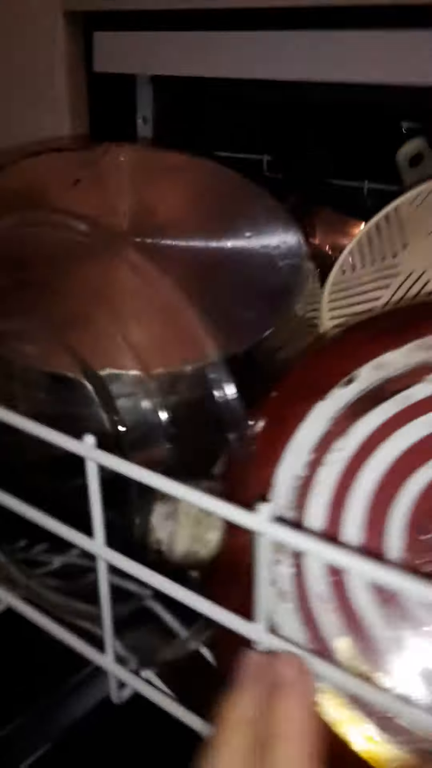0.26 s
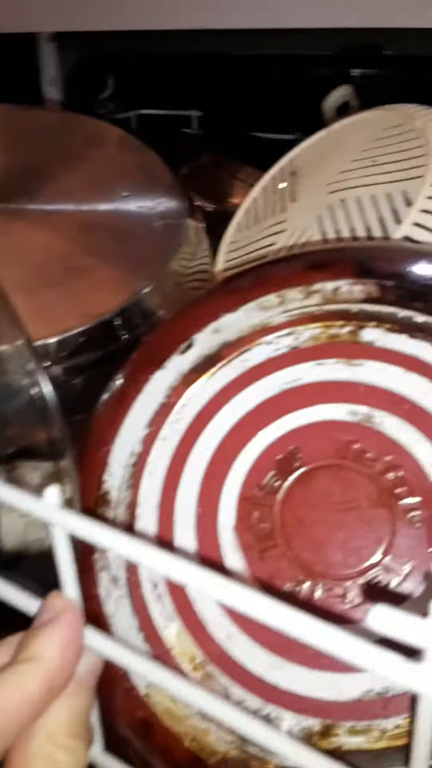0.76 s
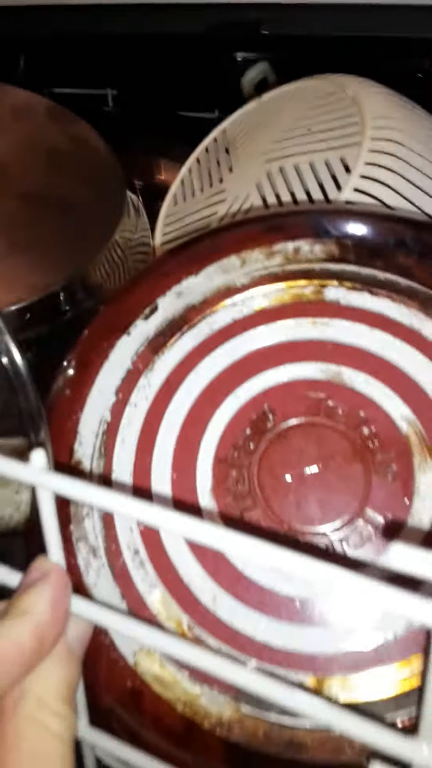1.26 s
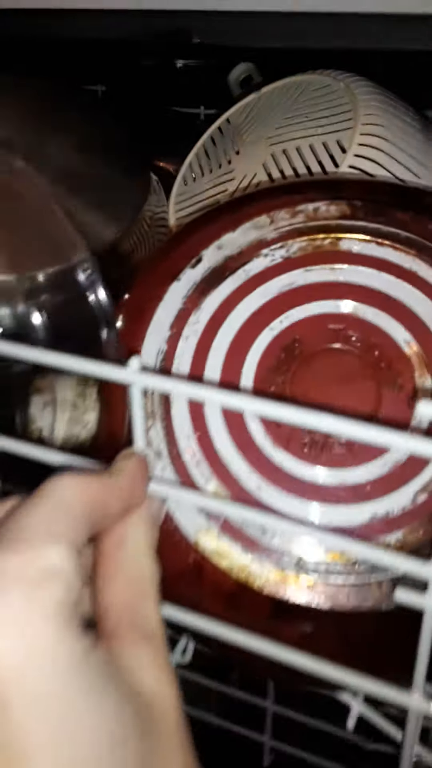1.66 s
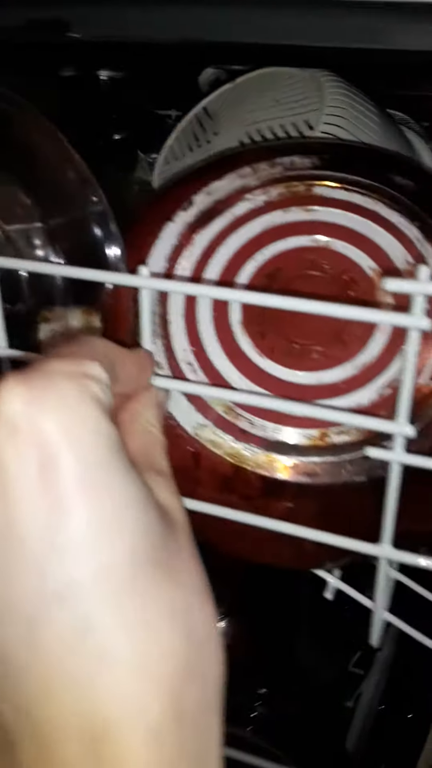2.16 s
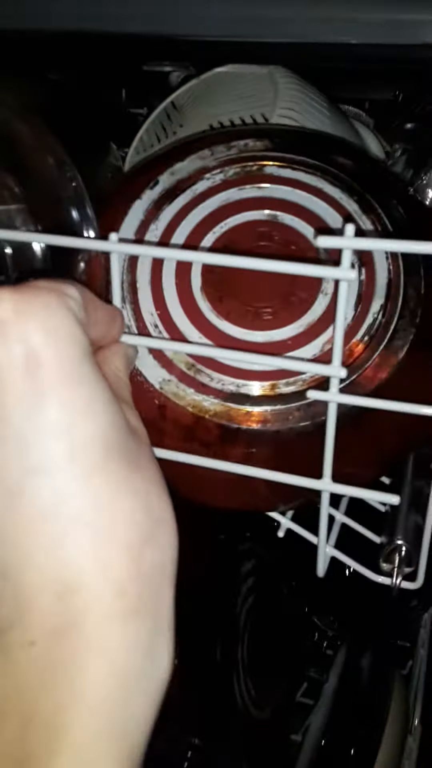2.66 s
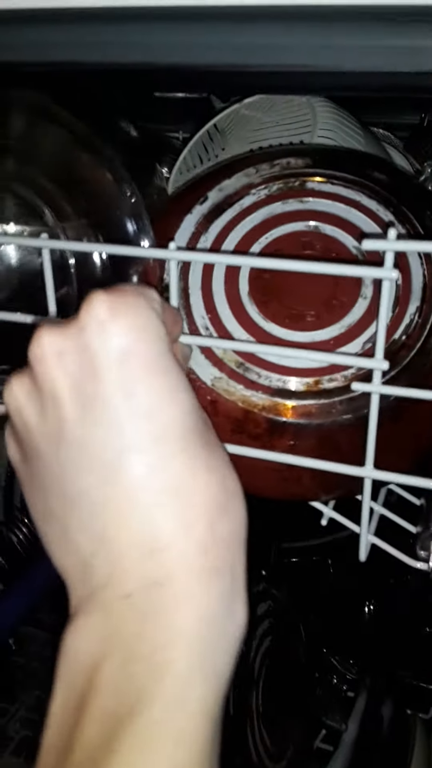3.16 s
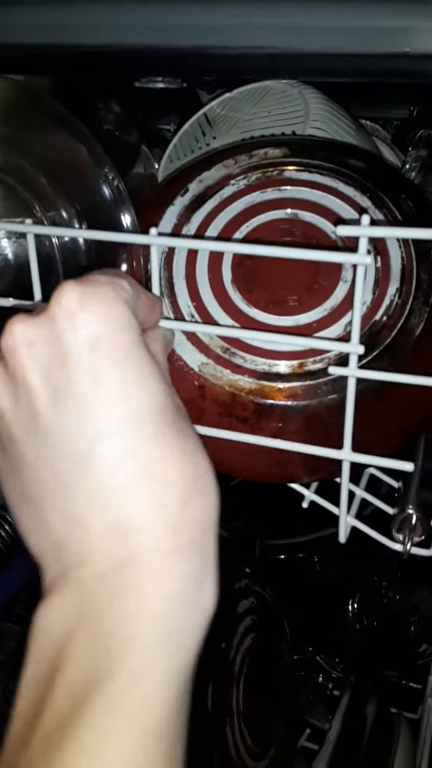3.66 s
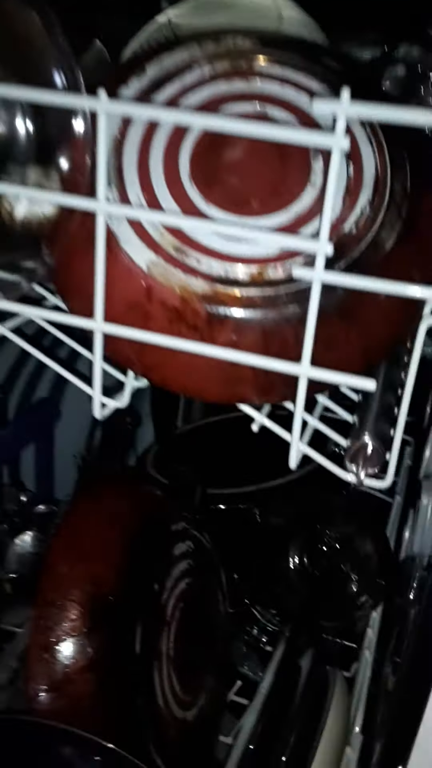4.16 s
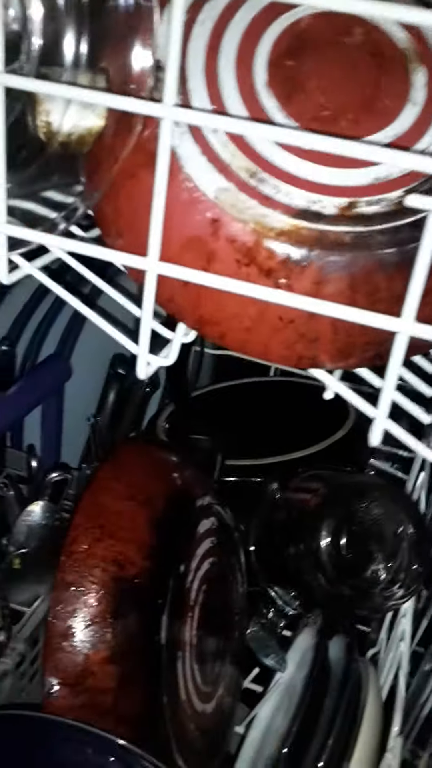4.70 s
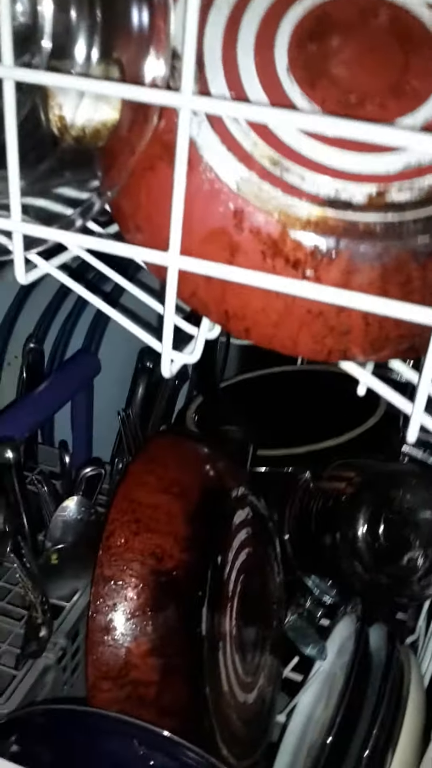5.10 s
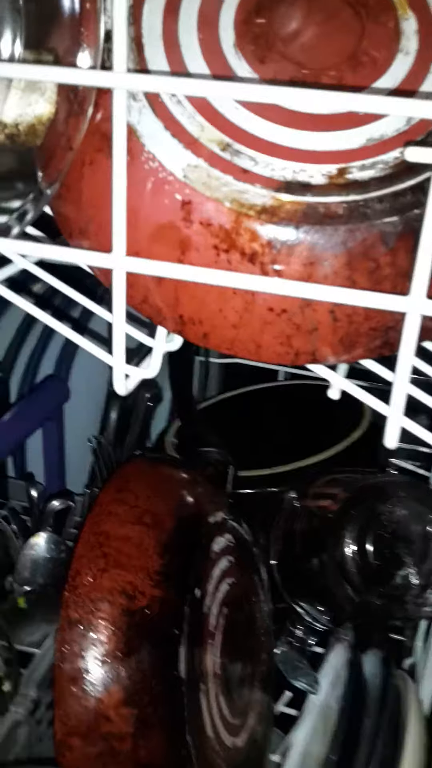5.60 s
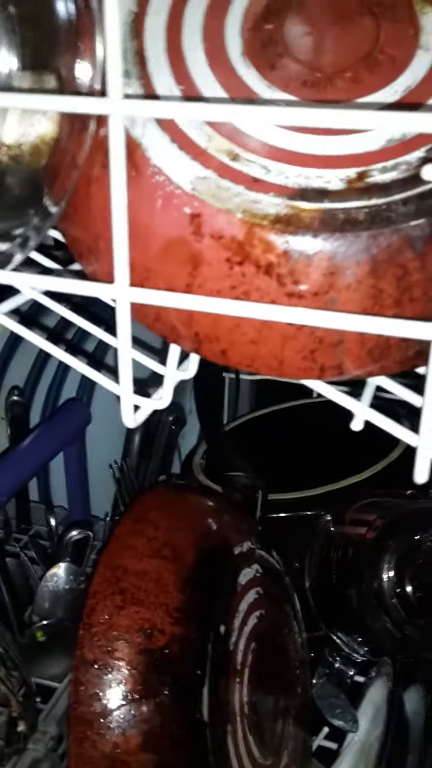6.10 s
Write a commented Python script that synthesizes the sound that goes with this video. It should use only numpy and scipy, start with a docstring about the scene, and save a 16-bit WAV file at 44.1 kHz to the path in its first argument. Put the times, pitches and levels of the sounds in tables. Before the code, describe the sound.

A close, dry stereo sound in a quiet kitchen with faint bassy room noise; the brighter detail sits to the right. At 0 s there is a weak low bump and barely audible trembling, then near quiet. Around 0.6-0.8 s a small rattle with a light pan knock. A very soft rolling begins about 0.9 s and picks up from 1.55 s, with rail thumps and wire ticks near 1.9-2.1 s. From 2 to 3.4 s the rack surges: low wheel rumble, chattering and slipping pans, scattered clinks, bright wire sizzle, hollow clunks at 2.86 and 3.05 s, a thump at 3.18 s. At 3.5 s comes the loudest moment, a deep thud with clustered clanks, ringing briefly in the steel tub. Quiet follows until a faint bump at 4.55 s, a clearer knock at 4.88 s with a thin ping, then weak taps and dull bumps at 5.45, 5.6-5.95 and 6.15 s.

```python
"""A wire dishwasher rack full of pans is pushed along its rails by hand, close to the microphone.
Wheel rumble and wire sizzle are shaped noise; pans chatter, slip and knock through ringing modes.
Jolts thump as short decaying tones, with a boom of noise; a few light knocks follow the push.
A decaying noise tail is the steel tub's ring, and a faint coloured noise is the quiet kitchen.
The left microphone port is shaded and the right one has a sharp treble resonance."""
import sys
import numpy as np
from scipy import signal
from scipy.fft import rfft, irfft, next_fast_len
from scipy.io import wavfile

SR = 44100
rng = np.random.default_rng(int(sys.argv[2]) if len(sys.argv) > 2 else 0)


def waveform_to_disk(signal):
    """Save audio, clipped to [-1, 1], as 16-bit WAV at the path in sys.argv[1]."""
    frames = np.transpose(np.atleast_2d(signal))
    scaled = np.clip(frames, -1, 1) * 32767
    samples = np.round(scaled).astype(np.int16)
    wavfile.write(sys.argv[1], SR, samples)


N = 279813
CLOCK = np.arange(N) / SR  # seconds through the scene
T = np.arange(SR // 2) / SR  # seconds after a blow

# Pans striking. Each row: start in seconds, strength in dB, clunk pitch in Hz,
# hardness in dB (high on bare wire, low on another pan).
KNOCKS = [(.666, -40.5, 622, -4.5), (1.56, -56, 440, -25), (1.889, -43, 536, 1.5), (1.988, -42, 649, 9),
          (2.08, -39.5, 602, 16.5), (2.699, -34, 618, -10.5), (2.83, -39.5, 706, 6),
          (2.864, -23.5, 830, -17.5), (3.045, -27, 829, -17.5), (3.297, -34, 620, -30),
          (3.378, -28, 530, -3), (3.479, -36, 700, -9), (3.489, -24.5, 848, 2), (3.501, -28, 851, -9),
          (3.554, -40.5, 604, -14.5), (4.494, -68.5, 562, 4.5), (4.79, -52.5, 481, -23.5),
          (4.879, -29.5, 568, -24), (4.949, -40.5, 801, -26.5), (4.97, -45.5, 756, -5.5),
          (5.454, -47.5, 627, -21), (5.616, -62, 648, -27), (5.756, -66, 577, -27.5),
          (5.779, -57, 619, -41.5), (5.887, -55.5, 595, -32.5), (5.913, -55.5, 443, -7),
          (5.951, -60.5, 606, 4), (6.149, -59, 443, -25), (6.162, -62, 462, -9.5)]
# What the pans ring with. Each row: pitch in Hz, relative level in dB, time to fall 60 dB in seconds.
PANS = [(481.2, -6, 0.25), (610, -3.5, 0.15), (694.6, -2.5, 0.11), (825, 1.5, 0.099), (903, 1, 0.18),
        (960.7, -1, 0.11), (1189, -2.5, 0.18), (1310, -13.5, 0.46), (1400, 2, 0.029), (1453, -10, 0.29),
        (1570, -4.5, 0.15), (1700, -12, 0.23), (1846, -10.5, 0.073), (1903, -14, 0.32), (2130, -21.5, 0.46),
        (2466, -16, 0.21), (2610, -9, 0.12), (2740, -15, 0.16), (2930, -14.5, 0.18), (3296, -13.5, 0.11)]
# Colour of hard contacts between pans. Each row: frequency in Hz, relative level in dB per Hz.
CRACK = [(200, -8.5), (500, 7), (1200, -2.5), (1700, -2.5), (2150, -9), (2900, -4.5), (3900, -26.5),
         (7000, -34.5), (12000, -37.5)]
# How alike the two channels are. Each row: frequency in Hz, likeness from 0 to 1.
LIKENESS = [(100, 0.88), (300, 0.72), (700, 0.63), (1500, 0.27), (4000, 0.04), (12000, 0.24)]


def amp(db):
    """Decibels to gain."""
    return 10 ** (np.asarray(db) / 20)


def unit(x):
    """Scale to rms 1."""
    return x / np.sqrt(np.mean(x ** 2) + 1e-20)


def along(points, hz):
    """Read a curve of (Hz, value) points on a log frequency axis."""
    f, v = np.transpose(points)
    return np.interp(np.log(hz + 1), np.log(f), v)


def filtered(x, response):
    """Multiply the spectrum of x by a response of frequency."""
    n = x.shape[-1]
    padded = next_fast_len(n + 8192, real=True)
    spectrum = rfft(x, padded) * response(np.fft.rfftfreq(padded, 1 / SR))
    return irfft(spectrum, padded)[..., :n]


def through(x, ring):
    """Pass a stereo sound through an impulse response scaled to keep the power of white noise."""
    ring = np.atleast_2d(ring)
    ring = unit(ring) / np.sqrt(ring.shape[1])
    return signal.oaconvolve(x.astype(np.float32), ring.astype(np.float32), axes=1)[:, :N]


def coloured(x, colour, size=8192):
    """Give x a spectrum by a minimum-phase filter, which puts no sound ahead of its attacks."""
    log_gain = np.log(amp(along(colour, np.fft.rfftfreq(size, 1 / SR))))
    cepstrum = irfft(log_gain)
    causal = 2 * cepstrum[:size // 2]
    return through(x, irfft(np.exp(rfft(causal, size))))


def noise(size):
    """White stereo noise, alike in the bass and much less so in the treble."""
    def mid_side(hz):
        turn = np.arccos(np.clip(along(LIKENESS, hz), 0, 1)) / 2
        return np.array([np.cos(turn), np.sin(turn)])
    mid, side = filtered(rng.standard_normal((2, size)), mid_side)
    return np.array([mid + side, mid - side])


def ringing(hz, db, t60):
    """Decaying modes; the less alike the ports are at a pitch, the further apart its phases there."""
    apart = np.arccos(np.clip(along(LIKENESS, hz), 0, 1)) * rng.choice([-.5, .5], len(hz))
    phase = np.pi * rng.integers(2, size=len(hz)) + np.array([apart, -apart])
    turn = np.outer(2 * np.pi * hz, T).astype(np.float32)
    fade = np.exp(np.outer(-np.log(1000) / t60, T).astype(np.float32))
    modes = (amp(db) * np.cos(phase)) @ (fade * np.sin(turn))
    modes += (amp(db) * np.sin(phase)) @ (fade * np.cos(turn))
    return modes * (1 - np.exp(-T / 0.0004))  # soften the onset


def add(track, s, sound):
    """Mix a sound in at time s."""
    part = track[..., max(round(s * SR), 0):][..., :len(T)]
    part += sound[..., :part.shape[-1]]


def bursts(times, levels_db, shape):
    """Power over time of blows that share one amplitude envelope."""
    power = np.zeros(N)
    for s, db in zip(times, levels_db):
        add(power, s, (amp(db) * shape) ** 2)
    return power


def trembling(drive, rate, spread_db, t60):
    """Power over time of random tiny impacts, rate a second, that follow the driving power."""
    happens = rng.random(N) < rate / SR
    blows = happens * amp(spread_db * np.clip(rng.standard_normal(N), -2, 2)) ** 2
    power = signal.lfilter([1], [1, -amp(-120 / (t60 * SR))], blows)
    return power / power.mean() * drive


def kitchen():
    """The quiet room is a steady faint noise, strongest in the bass."""
    # Each row: frequency in Hz, relative level in dB per Hz.
    room_colour = [(20, -21), (60, -1), (120, 3.5), (300, -9), (600, -18), (1000, -23), (1500, -26),
                   (3000, -40.5), (8000, -52)]
    return amp(-70.5) * coloured(noise(N), room_colour)


def held(start, end, release_db_per_s):
    """Gain of a motion that sets in, holds from start to end and dies away."""
    onset_db_per_s = 597.5
    rise_db = -onset_db_per_s * np.maximum(start - CLOCK, 0)
    return amp(rise_db - release_db_per_s * np.maximum(CLOCK - end, 0))


def motion():
    """Power over time of rumble, chatter and sizzle: the push, the rocking of the load and the grip."""
    # The push, slow at first and then in surges.
    # Each row: time in seconds, wheel rumble in dB, load chatter in dB.
    surges = [(0.898, -71.5, -89), (1.15, -61.5, -80), (1.5, -61, -79), (1.58, -45, -66), (1.799, -46, -58),
              (2.01, -36, -49.5), (2.17, -41.5, -46.5), (2.33, -46.5, -54.5), (2.46, -51.5, -58),
              (2.64, -42, -47), (2.8, -56, -66.5), (2.921, -46.5, -53), (3.07, -51.5, -55),
              (3.18, -39, -46.5), (3.299, -42.5, -53.5), (3.48, -42.5, -42.5)]
    # The load rocking when the rack is gripped, stopped or nudged.
    # Each row: start in seconds, hold in seconds, rumble in dB, chatter in dB.
    shakes = [(-0, 0.26, -66, -76), (0.623, .19, -54.5, -58.5), (3.53, 0.041, -51, -52.5),
              (4.546, 0.053, -57, -68), (4.773, .04, -51, -63.5), (4.92, 0.037, -56, -55),
              (5.464, 0.022, -59, -64), (5.771, 0.21, -54, -69.5), (6.153, 0.059, -63, -72)]
    stop_db_per_s, settle_db_per_s = 247.5, 81.5  # the wheels stop, the load settles
    shake_sizzle_db = -30.5  # the wires, relative to the rocking pans
    rest_rumble_db, rest_chatter_db = -86, -94.5  # the load is never quite still
    grip_s, grip_width_s, grip_db = 0.22, 0.13, -95.5  # a faint hiss as the hand takes hold

    s, rumble_db, chatter_db = np.transpose(surges)
    sizzle_db = -68.5 + 0.58 * (chatter_db + 48)  # dB of sizzle grow more slowly than dB of chatter
    push = amp([np.interp(CLOCK, s, db) for db in (rumble_db, chatter_db, sizzle_db)])
    power = (push * held(s[0], s[-1], stop_db_per_s)) ** 2
    for start, hold, low_db, pan_db in shakes:
        levels = amp([low_db, pan_db, pan_db + shake_sizzle_db])
        power += np.outer(levels, held(start, start + hold, settle_db_per_s)) ** 2
    grip = amp(grip_db) * np.exp(-((CLOCK - grip_s) / grip_width_s) ** 2 / 2)
    rumble = power[0] + amp(rest_rumble_db) ** 2
    rattle = power[1] + amp(rest_chatter_db) ** 2
    return rumble, rattle, power[2] + grip ** 2


def wheels(drive):
    """The wheels bump along the rails and shake the heavy rack: low noise in many tiny bumps."""
    # Each row: frequency in Hz, relative level in dB per Hz.
    rumble_colour = [(20, -58), (45, -32), (70, -7), (115, 1), (160, -7.5), (200, -2), (275, -3),
                     (370, -10.5), (500, -9.5), (800, -29), (2000, -61.5)]
    bumps = trembling(drive, rate=300, spread_db=2.5, t60=0.045)
    return coloured(noise(N) * np.sqrt(bumps), rumble_colour)


def chatter(drive):
    """Pans tremble and slip against each other, feeding their own modes."""
    # Each row: frequency in Hz, relative level in dB per Hz.
    chatter_colour = [(200, -30), (420, -4.5), (580, 6), (750, 0.5), (1020, 0), (1400, -8), (1900, -16),
                      (2200, -18), (2700, -16), (3500, -33.5), (5000, -39), (8000, -46)]
    power = trembling(drive, rate=150, spread_db=0.5, t60=0.031)
    power += amp(-3.5) ** 2 * slips(length=1.0)
    rub = coloured(noise(N) * np.sqrt(power), chatter_colour)
    rub += coloured(noise(N) * np.sqrt(slips(length=0.7)), CRACK)
    return amp(-3.5) * rub + amp(-25) * through(rub, ringing(*np.transpose(PANS)))


def clinks(drive, low_hz=1000, high_hz=5200, crowding=0.37, count=200):
    """Cutlery and rims touch at random, more often the harder the load trembles, each with its pitches."""
    largest_db, t60 = -6.5, 0.055  # level relative to the chatter drive; ring in seconds
    out = np.zeros((2, N))
    odds = np.cumsum(drive ** crowding)
    for when, pitch, size, second, third in rng.random((count, 5)):
        at = np.searchsorted(odds, when * odds[-1])
        hz = low_hz * (high_hz / low_hz) ** pitch
        db = largest_db - 14 * size - 9 * pitch  # higher clinks are weaker
        ratios = np.array([1, 1.4 + 0.72 * second, 1.7 + 0.7 * third])
        partials = ringing(hz * ratios, db - np.array([0, 3.5, 7]), np.full(3, t60))
        add(out, at / SR, np.sqrt(drive[at]) * partials)
    return out


def wires(drive):
    """Rolling, slips and knocks set the thin wires sizzling: bright noise, partly through their modes."""
    # The thin wires' modes. Each row: pitch in Hz, relative level in dB.
    wire_modes = [(3682, -7.5), (4081, 2.5), (4468, 1.5), (4600, -4.5), (4900, -11.5), (5190, -6.5),
                  (5580, -4.5), (6072, 0.5), (7200, 2.5), (9371, -10), (9710, -10.5), (10220, -3.5),
                  (11050, 11.5), (12109, -4)]
    # The wires while rolling, then when struck. Each row: frequency in Hz, relative level in dB per Hz.
    rolling_colour = [(1000, -31), (3000, -12), (5200, -10), (7000, -11.5), (9300, 3), (11000, -6),
                      (15800, -11)]
    struck_colour = [(1000, -26), (3000, -6), (4600, -1.5), (5700, -8), (6900, -3), (9000, 4),
                     (11000, -3.5), (13000, -5), (15800, -10.5)]
    times, strength_db, _, hard_db = np.transpose(KNOCKS)
    rolling = noise(N) * np.sqrt(trembling(drive, rate=990, spread_db=2, t60=0.04))
    tick = amp(-60 * T / 0.1) * (1 - np.exp(-T / 0.0026))
    power = bursts(times, strength_db + hard_db - 10, tick)
    power += amp(-14) ** 2 * slips(length=0.6)
    struck = noise(N) * np.sqrt(power)
    hz, db = np.transpose(wire_modes)
    modes = ringing(hz, db, np.full(len(hz), 0.2))
    sizzle = coloured(rolling, rolling_colour) + amp(1.5) * coloured(struck, struck_colour)
    return sizzle + through(amp(-18) * rolling + amp(-19) * struck, modes)


def clunk(hz, hold, ring_db):
    """A hollow tone with two side modes, choked when the pan settles and leaving a faint ring."""
    ratios, levels_db = np.array([0.57, 1, 1.245]), np.array([-19, 0, -11])
    tone = ringing(hz * ratios, levels_db, np.array([0.1, 0.25, 0.2]))
    choke = np.exp(-T / 0.06 - (T / hold) ** 6)
    return tone * (choke + amp(ring_db))


def jolts(cycles=9):
    """The loaded rack thumps on its rails for a few cycles, the tub booms and a pan hops."""
    # The rack jolting on its rails. Each row: start in seconds, thump level in dB, pitch in Hz.
    thumps = [(0.022, -36.5, 99), (0.802, -38.5, 250), (1.559, -38.5, 112.6), (1.619, -33.5, 126),
              (1.885, -31.5, 118), (2.09, -24, 109), (2.147, -31, 104), (2.343, -26.5, 268),
              (2.985, -30, 210.4), (3.175, -21, 281), (3.417, -29.5, 214), (3.502, -14.5, 116),
              (3.511, -18.5, 125.2), (3.515, -15.5, 219.3), (3.728, -39.5, 116.8), (4.554, -40.5, 188),
              (4.79, -35, 119.6), (4.819, -37.5, 253), (5.616, -43, 205.4), (5.778, -41, 160.7),
              (5.835, -33, 98.2), (6.146, -39.5, 100.3)]
    # The tub's boom. Each row: frequency in Hz, relative level in dB per Hz.
    boom_colour = [(20, -28), (40, -11.5), (62, 3), (80, 1), (125, -1), (220, -1.5), (320, -7), (500, -19),
                   (1000, -43), (2000, -69)]
    hop_db, hop_growth = -58, 0.55  # clunk after an average jolt; dB more per dB of jolt
    hop_hz, hop_spread = 600, 0.11  # pitch of that clunk; its scatter in octaves

    times, levels_db, _ = np.transpose(thumps)
    boom = bursts(times, levels_db - 10.5, amp(-60 * T / 0.15))
    out = coloured(noise(N) * np.sqrt(boom), boom_colour)
    for s, db, hz in thumps:
        envelope = amp(-60 * T * hz / cycles) * (1 - np.exp(-T / 0.002))
        add(out, s, amp(db) * np.sin(2 * np.pi * hz * T) * envelope)
        pitch = hop_hz * 2 ** (hop_spread * rng.standard_normal())
        hop = clunk(pitch, hold=0.019, ring_db=-21)
        add(out, s, amp(hop_db + hop_growth * (db - levels_db.mean())) * hop)
    return out


def tub(x):
    """The steel tub's dense ring is a noise tail that lasts longest in the bass."""
    # Each row: frequency in Hz, time to fall 60 dB in seconds.
    tub_decay = [(80, 0.46), (300, 0.19), (900, 0.31), (3000, 0.39), (10000, 0.23)]
    hz, t, z = signal.stft(noise(len(T)), SR, nperseg=256)
    fading = z * amp(-60 * t / along(tub_decay, hz)[:, None])
    tail = signal.istft(fading, SR, nperseg=256)[1][:, :len(T)]
    return through(x, tail * (1 - np.exp(-T / 0.0016)))


def slips(length):
    """Power over time of pans slipping: each grows and fades, over the given share of its rise time."""
    # Pans slipping on the wires. Each row: start in seconds, strength in dB, full rise time in seconds.
    scrapes = [(0.617, -57, 0.042), (2.02, -46.5, .02), (2.158, -45, 0.039), (2.368, -47.5, 0.018),
               (2.518, -43.5, 0.056), (2.602, -40.5, .026), (2.84, -38.5, 0.018), (3.132, -43, 0.023),
               (3.337, -43.5, 0.014), (3.43, -43, 0.029), (3.495, -27, 0.016)]
    power = np.zeros(N)
    for s, db, rise in scrapes:
        age = T / (rise * length)
        add(power, s, (amp(db) * age * np.exp(1 - age)) ** 2)
    return power


def knocks():
    """A knock is a crack, a hollow clunk and the pans' clang; harder contacts crack and clang more."""
    clang_scatter_db = 3  # each mode's level varies from knock to knock
    times, strength_db, pitch, hard_db = np.transpose(KNOCKS)
    cracks_db = strength_db - 9.5 + hard_db
    clangs_db = strength_db - 3.5 + 0.35 * hard_db
    power = bursts(times, cracks_db, amp(-60 * T / 0.0023))
    clash = amp(-60 * T / 0.039) * (1 - np.exp(-T / 0.0052))
    power += bursts(times, clangs_db + 5, clash)  # the clang's noise
    out = coloured(noise(N) * np.sqrt(power), CRACK)
    hz, db, t60 = np.transpose(PANS)
    for s, clunk_db, clunk_hz, clang_db in zip(times, strength_db, pitch, clangs_db):
        add(out, s, amp(clunk_db + 1.5) * clunk(clunk_hz, hold=0.016, ring_db=-19.5))
        modes_db = db + clang_scatter_db * rng.standard_normal(len(hz))
        add(out, s, amp(clang_db - 8) * ringing(hz, modes_db, t60))
    return out


def pings():
    """A lid or rim left singing by a knock is one decaying mode."""
    # Each row: start in seconds, pitch in Hz, level in dB, time to fall 60 dB in seconds.
    singing = [(2.698, 1380, -33.5, .078), (2.831, 1567, -37, .35), (2.839, 8900, -47, 0.23),
               (3.491, 1197, -19.5, 0.045), (3.494, 2120, -44.5, 0.47), (4.884, 1636, -45.5, 0.42),
               (4.884, 1770, -55, 0.26), (4.971, 2610, -51, 0.15), (5.454, 1276, -44.5, 0.091),
               (5.455, 2660, -62, 0.13), (5.95, 4700, -76.5, 0.1), (5.915, 2710, -69, 0.1),
               (6.163, 2640, -64.5, .09)]
    out = np.zeros((2, N))
    for s, hz, db, t60 in singing:
        add(out, s, ringing(np.array([hz]), np.array([db]), np.array([t60])))
    return out


def scene():
    """The rack, off to the right of the microphone, in a quiet kitchen."""
    # Shading of the left port. Each row: frequency in Hz, left minus right in dB.
    shading = [(120, -0.8), (300, 0), (600, -6), (1200, -6), (2500, -9), (6000, -15.5), (9000, -10.5),
               (10800, -2.5), (13000, -5), (15500, -10.5)]
    on_wheels, on_pans, on_wires = motion()
    low = wheels(on_wheels) + jolts()
    rattle = chatter(on_pans) + clinks(on_pans)
    sizzle = wires(on_wires)
    hits = knocks()
    into_tub = amp(-10) * low + amp(-4.5) * rattle + amp(-4) * sizzle + amp(-7.5) * hits
    rack = low + rattle + sizzle + hits + pings() + tub(into_tub)

    def ports(hz):
        left = amp(along(shading, hz))
        return np.array([left, np.ones_like(left)]) * 2 / (1 + left)  # the two gains average 1
    return filtered(rack, ports) + kitchen()


def record(dry, port_hz=9500, port_width_hz=850, port_db=17, skirt_hz=2800, hiss_db=-90):
    """The right port's resonance, faint hiss and the band limit."""
    top_hz = 15850

    def port(f):
        peak = f * f * (port_width_hz / port_hz) / (f * f - port_hz ** 2 - 1j * f * port_width_hz)
        return 1 + amp(port_db) * peak * np.exp(-((f - port_hz) / skirt_hz) ** 2)
    heard = np.array([dry[0], filtered(dry[1], port)])
    hiss = amp(hiss_db) * rng.standard_normal((2, N))
    return filtered(heard + hiss, lambda f: f < top_hz)


dry = scene()
out = record(dry)
waveform_to_disk(out)
```